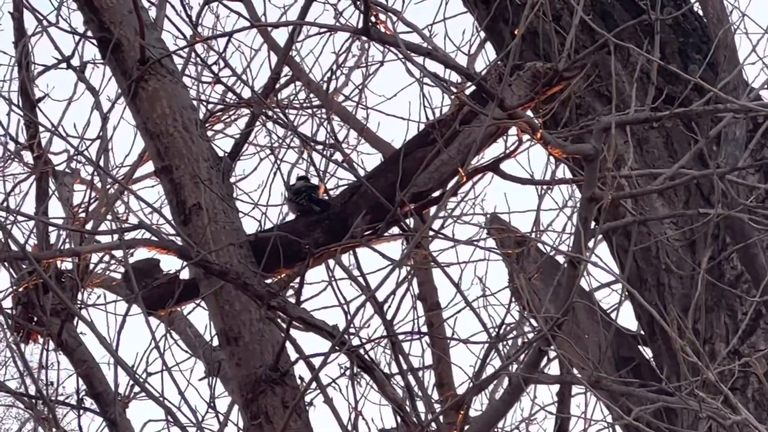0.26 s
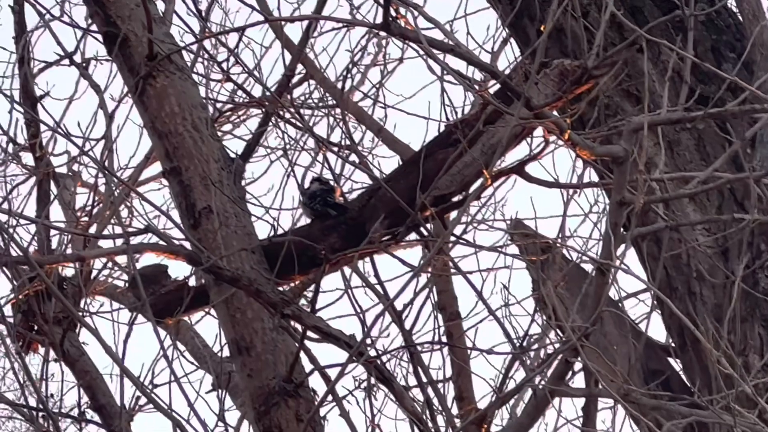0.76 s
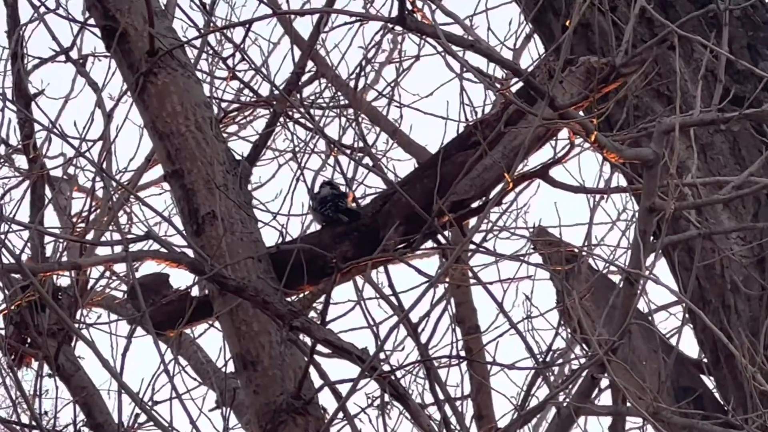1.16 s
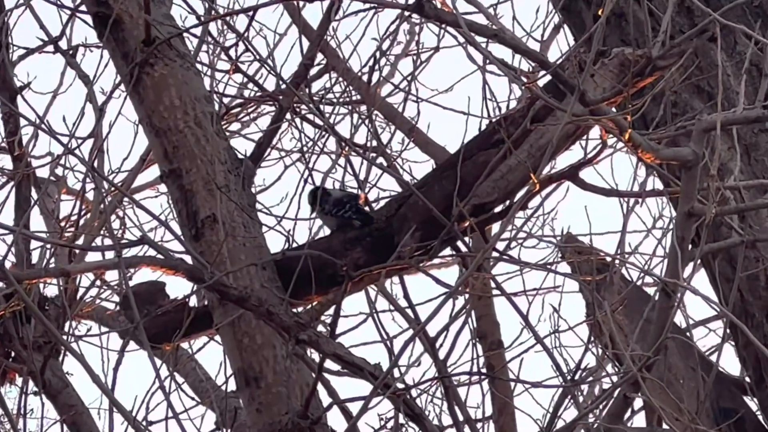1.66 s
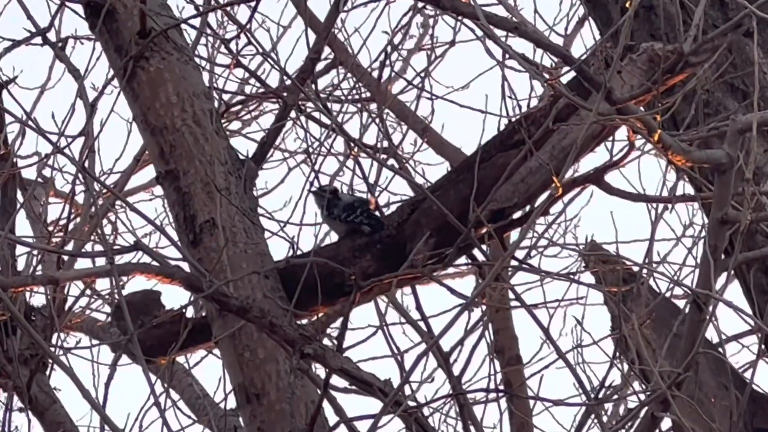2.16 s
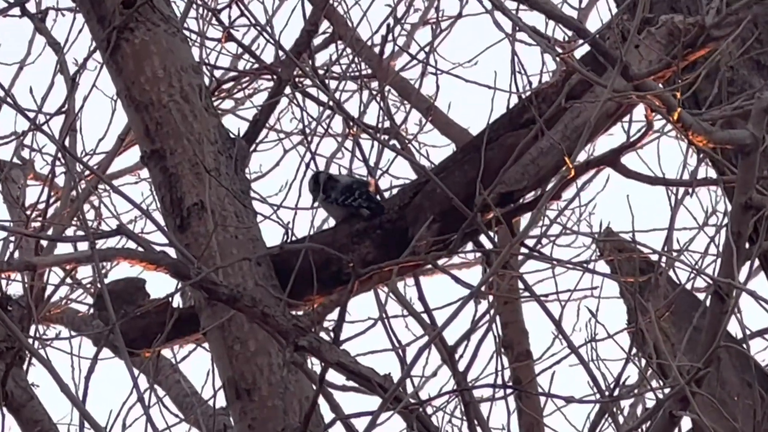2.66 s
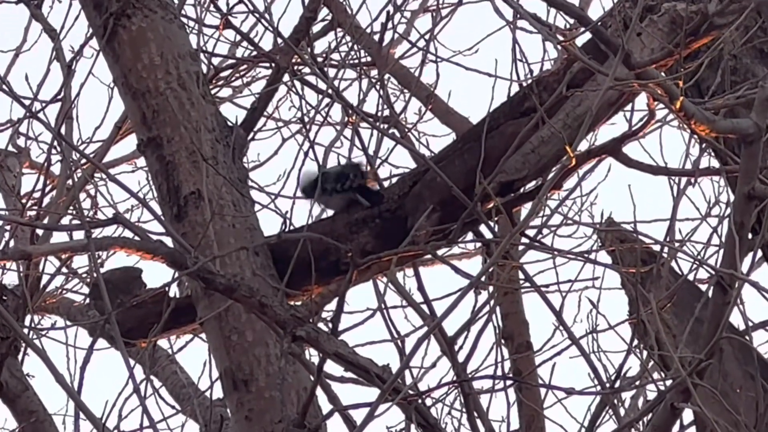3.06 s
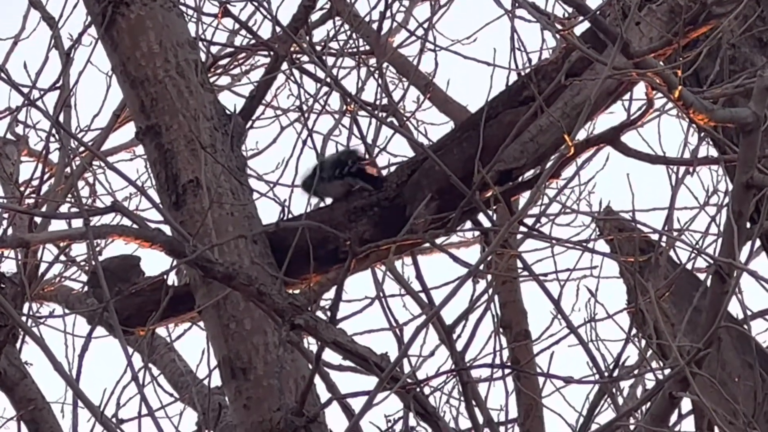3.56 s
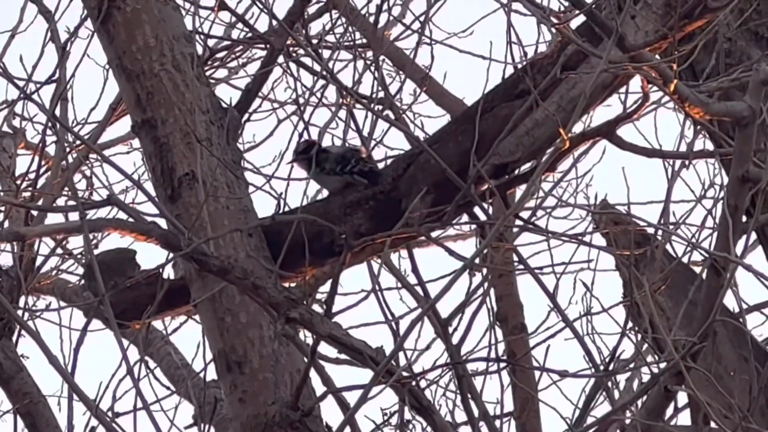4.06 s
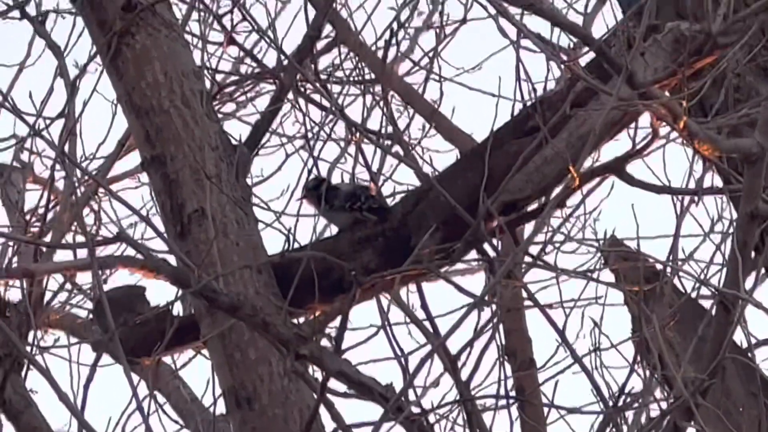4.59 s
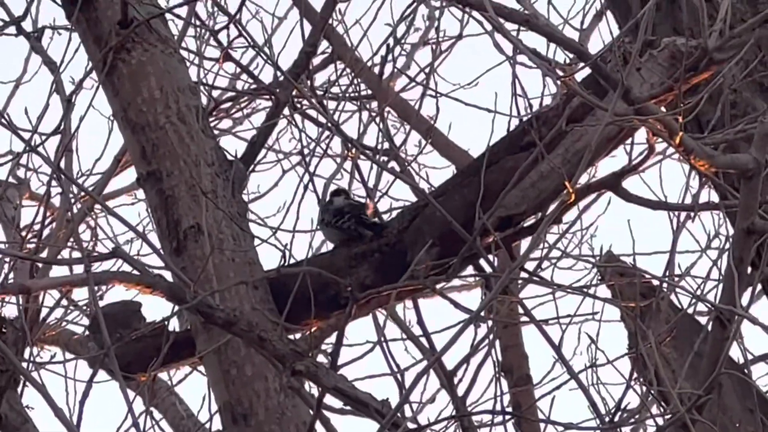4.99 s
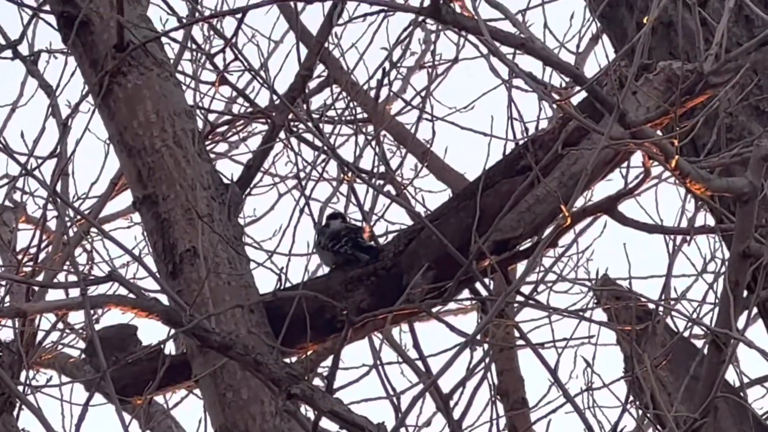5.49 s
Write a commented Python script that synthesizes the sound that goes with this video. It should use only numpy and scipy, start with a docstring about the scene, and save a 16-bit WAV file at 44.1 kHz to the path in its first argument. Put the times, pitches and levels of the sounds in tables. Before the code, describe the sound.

A woodpecker hammers one quick hollow roll on a dead limb while distant songbirds whistle and trill over a low, faint traffic hum.

```python
"""A woodpecker drums one roll on a dead limb among bare trees; the knocks come back from trunks and ground.
Each blow rings the damped modes of the limb, with a burst of bark noise. Songbirds further off whistle in gliding
tones, trill in pulses and chatter in throbbing noise, over five layers of noise for the distant traffic and far birds.
The hand-held camera body ticks and rustles near its microphones: scraped noise, and modes of its shell."""
import sys
import numpy as np
from scipy import signal
from scipy.fft import rfft, irfft
from scipy.io import wavfile

SR = 44100
rng = np.random.default_rng(int(sys.argv[2]) if len(sys.argv) > 2 else 0)


def store_pcm(level_fs):
    """Save levels as 16-bit WAV."""
    pcm = np.round(np.clip(level_fs, -1, 1) * 32767).astype(np.int16)
    wavfile.write(sys.argv[1], SR, np.atleast_2d(pcm).T)


N = 252693

# colour of what the hand does to the camera body: (frequency [Hz], level per Hz [dB])
TICK_COLOUR = [(1760, -37.5), (3000, -5), (4690, -10.5), (5760, -3), (6360, 2), (7690, 5.5), (10000, -13.5),
               (11200, -2), (12500, -20), (13500, -29), (13900, -17), (14800, -13.5), (16300, -42)]


def amp(db):
    """Decibels to a factor of amplitude."""
    return 10 ** (np.asarray(db) / 20)


def rms_one(x):
    """Scales to an effective level of 1."""
    return x / np.sqrt(np.mean(x ** 2) + 1e-20)


def in_time(rows):
    """Draws each column of a timed table as a line over the whole scene."""
    s, *columns = np.transpose(rows)
    return [np.interp(np.arange(N) / SR, s, column) for column in columns]


def gate(rows, fade_s=0.002):
    """1 while a table lasts, with short fades."""
    t = np.arange(N) / SR
    return np.clip(np.minimum(t - rows[0][0], rows[-1][0] - t) / fade_s, 0, 1)


def at_hz(points, hz):
    """Reads a spectrum table along a logarithmic frequency axis."""
    return np.interp(np.log(hz + 1), np.log(np.array(points)[:, 0]), np.array(points)[:, 1])


def coloured(x, spectrum):
    """Filters a sound by a table of levels in dB."""
    return irfft(rfft(x) * amp(at_hz(spectrum, np.fft.rfftfreq(N, 1 / SR))), N)


def ring(x, hz, t60):
    """A damped mode: a unit click sets a sine of height 1 ringing, 60 dB down after t60 seconds."""
    r = amp(-60 / (t60 * SR))
    w = 2 * np.pi * hz / SR
    return signal.lfilter([0, np.sin(w)], [1, -2 * r * np.cos(w), r * r], x + 1e-18)


def drift(rate):
    """Slow noise from random knots of spread 1, so many per second, joined by straight lines."""
    knots = np.arange(0, N / SR + 1, 1 / rate)
    return np.interp(np.arange(N) / SR, knots, rng.standard_normal(4000)[:len(knots)])


def woods(x, t60, width):
    """Scatter from many surfaces: a dying noise tail, its mid part of unit energy, partly shared by both sides."""
    t = np.arange(int(.7 * SR)) / SR
    envelope = amp(-60 * t / t60) * (1 - np.exp(-t / 0.0031))
    mid, side = rng.standard_normal((2, len(t))) * envelope
    tail = np.array([mid + width * side, mid - width * side]) / np.sqrt(np.sum(mid ** 2))
    return signal.oaconvolve(x[None], tail, axes=1)[:, :N]


def thin_out(x):
    """For a moment the background loses its lows: all below a moving corner is turned down."""
    # (time [s], corner [Hz], change of level below it [dB])
    thin = [(4.2, 130, -0.5), (4.42, 594, -8), (4.6, 700, -11), (4.69, 1400, -7), (4.8, 950, -6.5),
            (4.95, 575, -8), (5.25, 150, -5.5), (5.3, 130, -0.5)]
    hz, s, frames = signal.stft(x, SR, nperseg=1024)
    when, corner_hz, depth_db = np.transpose(thin)
    under = 1 / (1 + (hz[:, None] / np.interp(s, when, corner_hz)) ** 16)
    thinned = frames * amp(np.interp(s, when, depth_db) * under)
    return signal.istft(thinned, SR, nperseg=1024)[1][:, :N]


def air():
    """The distance: stereo noise in five layers of one spectrum, each on its own level, flickering a little."""
    # edges of the layers, low to high: [Hz]
    edges_hz = [20, 165, 600, 1700, 6000, 17000]
    # rumble, low traffic, tyre roar, far bird chorus, hiss: level before swells and flicker [dB]
    layer_db = [-56.5, -63.5, -66.5, -74, -88]
    # the spectrum they share: (frequency [Hz], level per Hz [dB])
    air_colour = [(18, -34), (30, -25), (53, 1.5), (108, -8.5), (325, -14.5), (608, -19), (1080, -18),
                  (1420, -21.5), (2350, -24.5), (2670, -18), (3600, -34.5), (4750, -37), (5380, -55.5),
                  (7450, -56.5), (12000, -69), (15600, -98.5), (22000, -120)]
    # bands where far motors and far birds crowd: (centre [Hz], width [Hz], boost [dB])
    crowded = [(64.5, 31, 5), (113.4, 40, 12), (816, 270, 8.5), (2695, 62, 5.0), (3390, 210, 10)]
    # how alike left and right are: (frequency [Hz], likeness [0 to 1])
    likeness = [(40, 0.88), (120, 0.94), (300, 0.77), (900, 0.085), (1700, 0.062), (2300, 0.78),
                (5000, 0.95), (8600, 1), (11000, 0.39)]
    # the far bird chorus comes and goes: (time [s], change of level [dB])
    chorus_swell = [(0, 5.5), (1.2, 6.5), (1.65, 1.3), (2.9, -3.5), (4.0, -5.5), (4.8, 1), (5.73, -3)]
    # the rumble sinks for a moment: (time [s], change of level [dB])
    rumble_gap = [(3.95, 0), (4.3, -2), (4.42, -11), (4.62, -17), (4.69, 1), (4.95, 4), (5.3, 1)]

    hz = np.fft.rfftfreq(N, 1 / SR)
    colour_db = at_hz(air_colour, hz)
    colour_db = colour_db + sum(db / (1 + (2 * (hz - top) / width) ** 2) for top, width, db in crowded)
    alike = np.clip(at_hz(likeness, hz), 0, 1)
    mid, side = rfft(rng.standard_normal((2, N)))
    both = amp(colour_db) * (np.sqrt(1 + alike) * mid + np.sqrt(1 - alike) * side * [[1], [-1]])
    octave, out = np.log2(hz + 1), 0
    swells = [in_time(rumble_gap)[0], 0, 0, in_time(chorus_swell)[0], 0]
    for low, high, db, swell_db in zip(edges_hz, edges_hz[1:], layer_db, swells):
        # neighbouring layers cross over within half an octave
        share = np.clip(.5 + 2 * np.minimum(octave - np.log2(low), np.log2(high) - octave), 0, 1)
        layer = rms_one(irfft(both * np.sqrt(share), N))
        out = out + amp(db + swell_db + 2.4 * drift(11)) * layer
    return thin_out(out)


def puffs():
    """A soft low puff, then a brief rough chip from a far bird: band-limited noise that swells and dies."""
    # (time of the top [s], rise [ms], fall [ms], low edge [Hz], high edge [Hz], level [dB])
    puff_rows = [(4.22, 6.6, 114, 400, 1160, -58), (5.63, 10, 11, 3020, 4400, -71)]
    out = 0
    for (s, rise_ms, fall_ms, low_hz, high_hz, db), noise in zip(puff_rows, rng.standard_normal((len(puff_rows), N))):
        band = signal.butter(3, [low_hz, high_hz], "band", fs=SR, output="sos")
        since_ms = (np.arange(N) / SR - s) * 1000
        shape = np.exp(-(since_ms / np.where(since_ms < 0, rise_ms, fall_ms)) ** 2)
        out = out + amp(db) * shape * rms_one(signal.sosfilt(band, noise))
    return out


def chatter():
    """A far buzzy chatter in two bouts: throbbing noise through one narrow resonance near 5 kHz."""
    # (time [s], level [dB])
    bouts = [(0.55, -92), (0.914, -76.5), (1.3, -84), (1.5, -105), (4.98, -105), (5.08, -84), (5.32, -96)]
    centre_hz, throbs_per_s = 4970, 36
    throb = .3 + np.sin(np.pi * throbs_per_s * np.arange(N) / SR) ** 4
    buzz = rms_one(ring(rng.standard_normal(N) * throb, centre_hz, 0.023))
    return amp(in_time(bouts)[0]) * gate(bouts) * buzz


def trill():
    """In each pulse the high voice swells, then the low voice comes in, drops fast and lingers; breath fills in."""
    # (time [s], falling low voice [dB], high voice [dB]), both before a trim
    voices = [(3.885, -56.5, -80), (3.927, -60.5, -58.5), (4.217, -61.5, -65), (4.373, -62.5, -69),
              (4.385, -95, -80)]
    # (time [s], pulses [per s])
    pace = [(3.885, 64.3), (4.217, 61.2), (4.385, 61.4)]
    # breath noise: (frequency [Hz], level per Hz [dB])
    breath_colour = [(1900, -12), (2300, -3.5), (2600, -25), (3400, -4.5), (4000, -16), (5000, -3.5),
                     (5600, -9.5), (5900, -47), (6500, -91)]
    low_end_hz, low_fall_hz = 2550, 975
    high_base_hz, high_rise_hz = 4670, 462.5
    low_lead = .18   # the low voice runs ahead by this share of a pulse
    breath_db = -4   # relative to the low voice

    (low_db, high_db), (per_s,) = in_time(voices), in_time(pace)
    turn = (np.cumsum(per_s * gate(pace, 1e-4)) / SR + 0.43) % 1   # place within the pulse, 0 to 1
    ahead = (turn + low_lead) % 1
    low_hz = low_end_hz + low_fall_hz * (1 - ahead) ** 4
    high_hz = high_base_hz + high_rise_hz * np.sin(np.pi * turn ** 1.5)
    pulse = np.sin(np.pi * ahead ** 0.5) ** 2
    swell = 0.083 + np.sin(np.pi * turn ** 4.1) ** 2
    low = rms_one(np.sin(2 * np.pi * np.cumsum(low_hz) / SR) * pulse)
    high = rms_one(np.sin(2 * np.pi * np.cumsum(high_hz) / SR) * swell)
    breath = amp(breath_db) * rms_one(coloured(rng.standard_normal(N), breath_colour)) * (.7 + pulse)
    husk = amp(3.5 * drift(400))   # a fast, rough waver of level
    low_part = amp(low_db - 0.5) * (husk * low + breath)
    high_part = amp(high_db - 11.5) * husk * high
    return gate(voices) * (low_part + high_part)


def glide(s, length, first_hz, last_hz, bend, db, change_db):
    """Pitch and level of one note: the glide slows down for a bend over 1; the level fades in and out."""
    attack_s, release_s = 0.0059, 0.0049
    since = np.linspace(0, length, 40)
    edge = np.clip(np.minimum(since / attack_s, (length - since) / release_s), .03, 1)
    hz = last_hz + (first_hz - last_hz) * np.abs(1 - since / length) ** bend
    return np.transpose([s + since, hz, db + change_db * since / length + 20 * np.log10(edge)])


def whistles(calls, overtones=()):
    """Near-pure tones that waver slightly on their way through the twigs."""
    out = np.zeros(N)
    for rows in calls:
        s, hz, db = np.transpose(rows)
        at = np.arange(max(round(s[0] * SR), 0), min(round(s[-1] * SR), N))
        hz, db = np.interp(at / SR, s, hz), np.interp(at / SR, s, db)
        phase = 2 * np.pi * np.cumsum(hz) / SR
        tone = np.sin(phase)
        for k, top, width, over_db in overtones:
            near = np.exp(-((k * hz - top) / width) ** 2)
            tone += amp(over_db) * near * np.sin(round(k) * phase)
        fades = signal.windows.tukey(len(at), min(200 / len(at), 1))
        out[at] += np.sqrt(2) * amp(db) * fades * tone
    return out * amp(3.1 * drift(150))


def rising_whistles():
    """One bird repeats a rising whistle; its overtones are heard only near a throat resonance."""
    # (time of the top [s], change of level [dB])
    repeats = [(0.13, -0.4), (0.388, 0), (0.648, 1.2), (0.903, 0.2), (1.163, 0.9)]
    # one whistle: (time from the top [s], pitch [Hz], level [dB])
    rising_shape = [(-0.16, 1190, -71.5), (-0.105, 1507, -61), (-0.022, 1920, -53), (-0.016, 2060, -54),
                    (0.0, 2730, -44.5), (0.022, 2817, -59)]
    # (multiple of the pitch, resonance [Hz], width [Hz], level [dB])
    throat = [(2, 5540, 470, -33), (4, 7830, 1100, -25.5)]
    return whistles([np.add(rising_shape, (s, 0, db)) for s, db in repeats], throat)


def other_calls():
    """Falling whistles, short or long, and single notes of other birds, each a tone without overtones."""
    # falling whistles, short or long, one list each: (time [s], pitch [Hz], level [dB])
    sweeps = [
        [(0.36, 5220, -70), (0.404, 5180, -72.5), (0.452, 4330, -65), (0.52, 3910, -69), (0.636, 3550, -66.5),
         (0.82, 3370, -72)],
        [(1.24, 8000, -71), (1.255, 6700, -54), (1.277, 5520, -45), (1.301, 4790, -49), (1.33, 4440, -59)],
        [(1.355, 3680, -59), (1.365, 3620, -51), (1.445, 3220, -49.5), (1.523, 2695, -51.5),
         (1.572, 2490, -54.5)],
    ]
    # single notes: (time [s], length [s], first pitch [Hz], last pitch [Hz], bend of the glide,
    # level [dB], change by the end [dB])
    notes = [(0.0, 0.11, 4800, 4450, 1.66, -64, -6.5), (0.0, 0.076, 1555, 2390, .7, -75, 10),
             (0.149, .045, 6900, 7170, 1.1, -80, -6), (0.216, 0.097, 6300, 6470, 1.2, -86, -.6),
             (0.248, 0.076, 2246, 2390, 0.9, -60, -9), (0.257, 0.062, 5030, 4660, 0.85, -76, 12.5),
             (0.399, 0.17, 3230, 3270, 1, -68.5, -6), (1.74, .05, 2250, 1770, 1.8, -73, -16),
             (1.792, 0.11, 2362, 2330, 1.3, -65.5, -2.5), (2.05, .07, 2267, 1680, 1.1, -75, -11),
             (2.079, 0.044, 2424, 2336, .9, -63.5, -7), (2.199, 0.24, 2586, 2683, 1.2, -75.5, -11),
             (2.385, 0.042, 2480, 1930, 1.7, -76, 1.5), (2.472, 0.056, 3450, 3270, 1.1, -79, -2),
             (2.638, 0.075, 3590, 3540, 1.1, -81.5, -.6), (2.728, 0.16, 3653, 3560, 0.86, -81, 4),
             (3.001, 0.067, 2290, 2350, 1.3, -72.5, 15.5), (3.489, .014, 3360, 2460, 0.99, -45.5, 2.5),
             (3.514, 0.044, 2185, 2210, .8, -48, -2.5), (3.66, 0.044, 5900, 6340, 1.4, -72, 7),
             (3.753, .06, 3390, 3233, 2.5, -58, 0), (3.783, .04, 4730, 4970, 1.5, -65.5, -4),
             (3.824, .032, 4970, 4767, 0.79, -43, -3.5), (3.862, 0.015, 3450, 3090, 0.76, -44, -4),
             (4.38, 0.03, 2270, 2240, 1.1, -63, -4), (4.393, 0.045, 5050, 4970, 1.1, -82, -8),
             (4.433, 0.082, 2580, 2670, 1.4, -78, 0), (4.464, 0.051, 4930, 3520, 1.5, -84, -5),
             (4.54, 0.037, 3470, 3090, .7, -71, -10), (4.58, 0.2, 2338, 2290, 0.97, -69, -4),
             (5.02, 0.017, 3220, 3220, 1.1, -62, -7)]
    return whistles(sweeps + [glide(*note) for note in notes])


def songbirds():
    """Birds further off, with scatter from many trunks; they reach the left microphone a little earlier."""
    t60_s, wet_db, lead_us = 0.43, -6.5, 6.5
    birds = rising_whistles() + other_calls() + trill() + chatter()
    far = birds + amp(wet_db) * woods(birds, t60_s, width=0.43)
    lag = lead_us * SR / 1e6
    # an all-pass delays by a fraction of a sample
    far[1] = signal.lfilter([1 - lag, 1 + lag], [1 + lag, 1 - lag], far[1])
    return far


def rustle():
    """Fingers shifting on the camera, close to the microphones: coloured noise with strong random grains."""
    # (time [s], level [dB])
    shifting = [(2.75, -87), (2.93, -74), (3.16, -86), (3.308, -68), (3.45, -76.5), (3.742, -74),
                (3.83, -86), (3.994, -77.5), (4.06, -101)]
    rough = rng.standard_normal(N) * amp(4.7 * drift(45))
    grainy = rough * (1 + 16.0 * (rng.random(N) < .0015))
    return amp(in_time(shifting)[0]) * gate(shifting) * rms_one(coloured(grainy, TICK_COLOUR))


def ticks():
    """Camera body ticks: each is a short scrape of noise; part of it rings the shell."""
    # (time [s], strength [dB], time to fall to 1/e [ms], thin top ring [dB]), strength before a 3 dB trim
    tick_rows = [(1.598, -36.5, 1.05, -18), (1.7316, -51.5, 3.4, 2), (2.135, -40, 1.55, -16),
                 (2.144, -40.5, 3.9, -16), (2.151, -40.5, 2.4, -9), (2.5802, -46, 2.4, -21),
                 (2.5872, -36, 4.2, -16), (2.8216, -55, 1.7, -7), (2.829, -43.5, 1.2, -14),
                 (2.8749, -57, 2.2, -15), (2.8946, -42, 1.5, -18.5), (2.9145, -41.5, 1.1, -25),
                 (2.9589, -52, 2.2, -24), (3.015, -36, 2.8, -9.5), (3.0685, -46.5, 1.3, -9),
                 (3.2317, -37, 3.2, -18), (3.2674, -61, 2.4, -17), (3.375, -46, 2.4, -14),
                 (3.556, -46, 2.8, -14), (3.6748, -60, 2.2, -8), (3.7262, -35.5, 0.81, -24),
                 (3.7574, -48, 2.2, -19), (3.8713, -54, 2.2, -19), (4.036, -51, 1.4, -18),
                 (4.9, -51, 1.3, -24), (4.9504, -46, 2.1, -28), (4.9724, -50, 1.2, -23),
                 (5.0406, -57, 1.3, -21)]
    # modes of the shell: (frequency [Hz], relative level [dB], t60 [s])
    shell_modes = [(6400, 4, 0.1), (7120, 6, 0.054), (13950, -9, .05), (15200, 9, .04)]
    shell_db, shell_spread_db = -21.5, 5   # each tick strikes the shell differently
    top_ring_hz, top_ring_t60_s = 10500, .07
    tail_db, tail_t60_s = -10, 0.24

    (crack, strike, top), t = np.zeros((3, N)), np.arange(2000) / SR
    for (s, db, ms, top_db), noise in zip(tick_rows, rng.standard_normal((len(tick_rows), 2000))):
        burst = amp(db - 3) * noise * np.exp(-1000 * t / ms)
        at = slice(round(s * SR), round(s * SR) + 2000)
        crack[at] += burst
        strike[at] += amp(shell_db + shell_spread_db * noise[-1]) * burst   # last sample serves as luck
        top[at] += amp(top_db) * burst
    crack = crack + amp(tail_db) * woods(crack, tail_t60_s, width=0.19)   # nearby surfaces
    shell = sum(amp(db - 25.0) * ring(strike, hz, t60) for hz, db, t60 in shell_modes)
    shell += amp(-5.5) * ring(top, top_ring_hz, top_ring_t60_s)
    return coloured(crack, TICK_COLOUR) + shell


def tap():
    """A single dull tap nearby: one short ring from a soft contact."""
    tap_s, tap_db, tap_hz = 5.439, -40, 890
    click = 1. * (np.arange(N) == round(tap_s * SR))
    touch = signal.sosfilt(signal.butter(2, 2 * tap_hz, fs=SR, output="sos"), click)
    return amp(tap_db) * ring(touch, tap_hz, 0.0053)


def drumming():
    """Every blow lands on nearly the same spot, so it rings the same modes and returns by the same paths."""
    # bill on wood: (time [s], strength [dB]), before a 9 dB trim
    drum = [(3.0789, -22.2), (3.1452, -20.1), (3.2052, -19.5), (3.2642, -18.0), (3.3227, -18.2),
            (3.3826, -17.0), (3.4432, -17.3), (3.504, -17.4), (3.5657, -16.9), (3.6277, -18.1),
            (3.6892, -18.4), (3.7527, -17.7), (3.8159, -18.3), (3.8799, -18.5)]
    # modes of the limb: (frequency [Hz], level [dB], t60 before the cap below [s])
    limb = [(394.2, -17, 0.11), (540, -12.5, 0.054), (832, -16.5, .1), (938.5, -8, 0.11),
            (1065.7, -6.5, 0.064), (1134, -5, 0.057), (1216, -11.5, 0.045), (1313.3, -1.5, 0.037),
            (1330, -39.5, 0.017), (1520, -48, 0.035), (2075, -18.5, 0.045), (2730, -40, .03),
            (2290, -14, 0.034), (2425, -18, 0.023)]
    # arrivals of each knock: (delay [ms], level [dB], left over right [dB])
    arrivals = [(0, -2.2, 1.7), (1.58, 2.7, 2.4), (4.82, -6.9, .9), (6.66, -6.3, 2.5), (11.22, -14.1, .1),
                (22.15, -18.3, -3.1)]
    # splintery bark noise of each blow: (frequency [Hz], level per Hz [dB])
    bark_colour = [(1400, -49), (1800, -8.5), (2450, -2), (2900, -15.5), (4000, -30), (5600, -18.5),
                   (7000, -43), (9000, -81)]
    longest_s = .09        # rotten wood damps every mode at least this fast
    mode_spread_db = 1.4   # no two blows ring the modes quite alike
    bill_soft_hz, limb_low_hz = 2574, 416
    bark_db, bark_t60_s = -7.5, 0.2
    wet_db, wet_t60_s = -6.5, 0.25
    far_echo_ms, far_echo_db = 140, -22.5
    lows_lean, lows_hz = 0.24, 800   # the lows of the knock lean to the right by this share

    blows = np.zeros(N)
    blows[[round(s * SR) for s, db in drum]] = amp(np.array(drum)[:, 1] - 9.0)
    luck = np.zeros((N, len(limb)))
    luck[blows > 0] = mode_spread_db * rng.standard_normal((len(drum), len(limb)))
    knock = np.zeros(N)
    for (hz, db, t60), luck_db in zip(limb, luck.T):
        knock += ring(blows * amp(db + luck_db), hz, min(t60, longest_s))
    # the bill is a soft hammer, and a limb this thin radiates no bass
    knock = signal.sosfilt(signal.butter(2, bill_soft_hz, fs=SR, output="sos"), knock)
    knock = signal.sosfilt(signal.butter(10, limb_low_hz, "high", fs=SR, output="sos"), knock)

    since = np.convolve(blows, amp(-60 * np.arange(6000) / SR / bark_t60_s))[:N]
    splinters = 0.14 * rng.standard_normal((2, N)) + rng.standard_normal(N)   # mostly alike on both sides
    bark = amp(bark_db) * coloured(since * splinters, bark_colour)
    out = bark + amp(wet_db) * woods(knock, wet_t60_s, width=0.57)
    for ms, db, pan_db in arrivals + [(far_echo_ms, far_echo_db, 0)]:
        out += np.roll(knock, round(ms * SR / 1000)) * amp(db + np.array([[pan_db], [-pan_db]]) / 2)
    lows = signal.sosfilt(signal.butter(2, lows_hz, fs=SR, output="sos"), out)
    return out + [[-lows_lean], [lows_lean]] * lows


def scene():
    """Sums all sources at the two microphones, from the distance to the woodpecker."""
    return air() + puffs() + songbirds() + rustle() + ticks() + tap() + drumming()


def record(dry):
    """Above a port resonance the two microphones turn apart in phase; the top is cut."""
    # (frequency [Hz], phase between the two microphones [radians])
    ports = [(8700, 0.01), (9900, 3.1), (10900, 3.3), (11700, 6.2), (12600, 6.5), (13400, 9.4),
             (14100, 9.6), (15100, 12.4)]
    cutoff_hz = 16400   # 70 dB down from here up
    apart = at_hz([(0.95, 0.0059)] + ports, np.fft.rfftfreq(N, 1 / SR))
    turned = irfft(rfft(dry) * np.exp(.5j * apart * [[1], [-1]]), N)
    return signal.sosfilt(signal.cheby2(12, 70, cutoff_hz, fs=SR, output="sos"), turned)


dry = scene()
out = record(dry)
store_pcm(out)
```